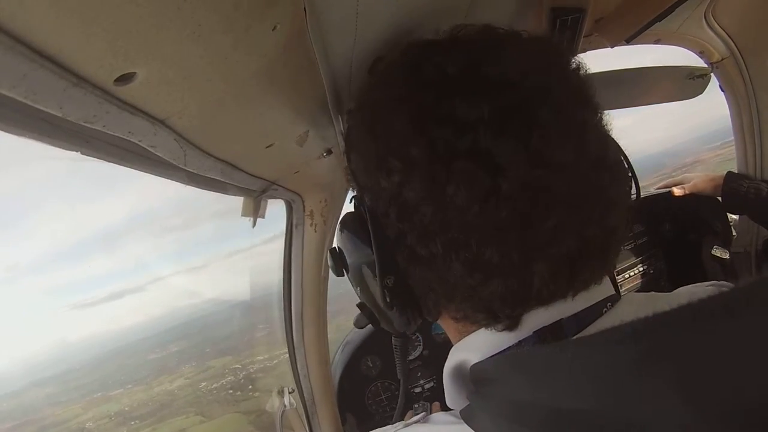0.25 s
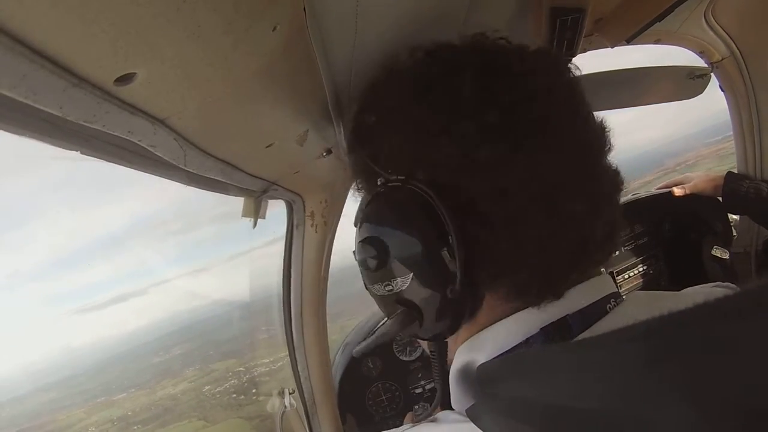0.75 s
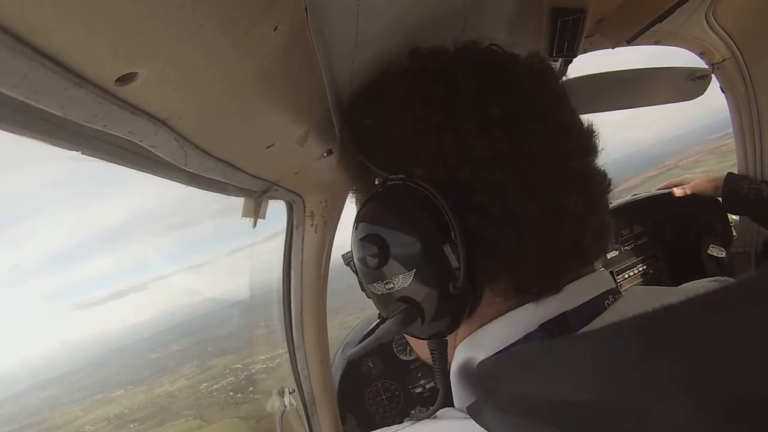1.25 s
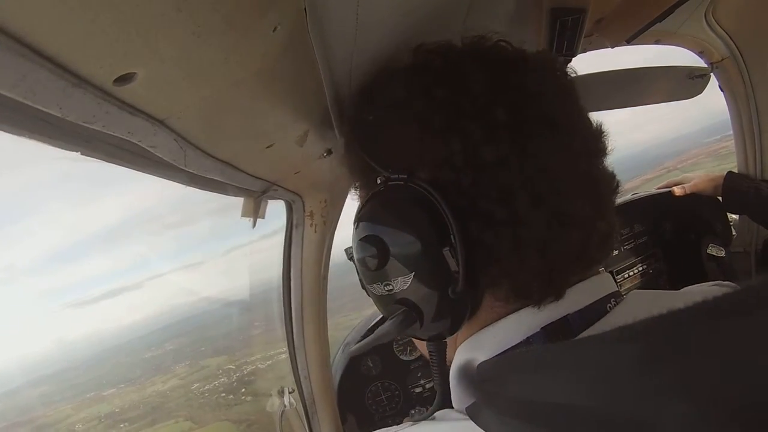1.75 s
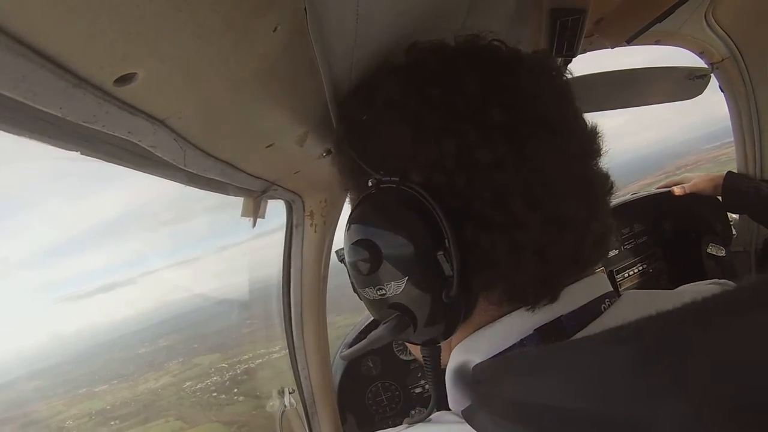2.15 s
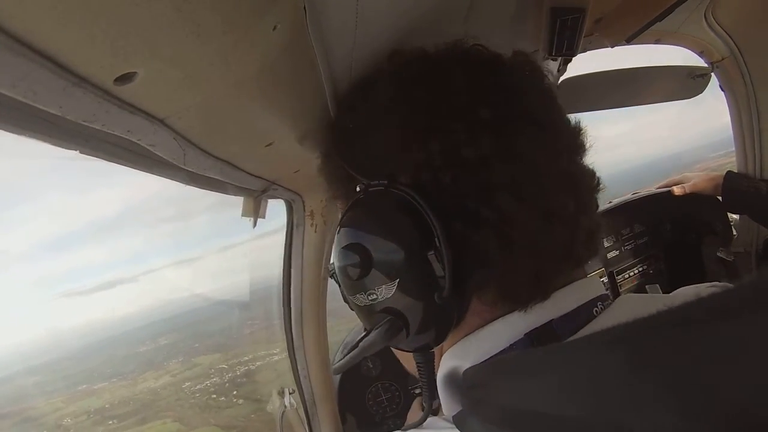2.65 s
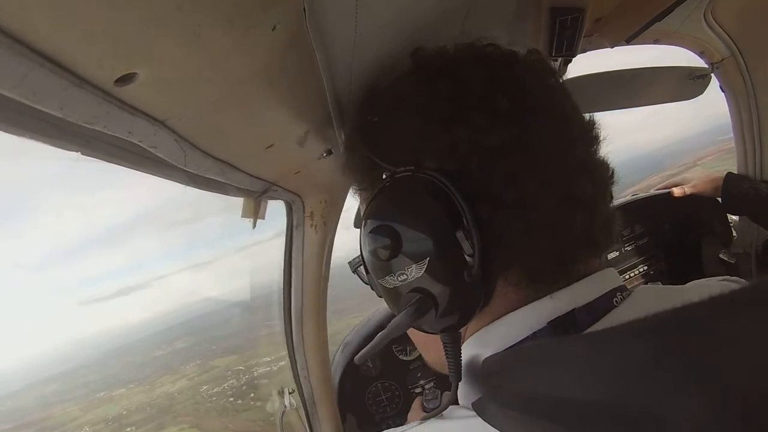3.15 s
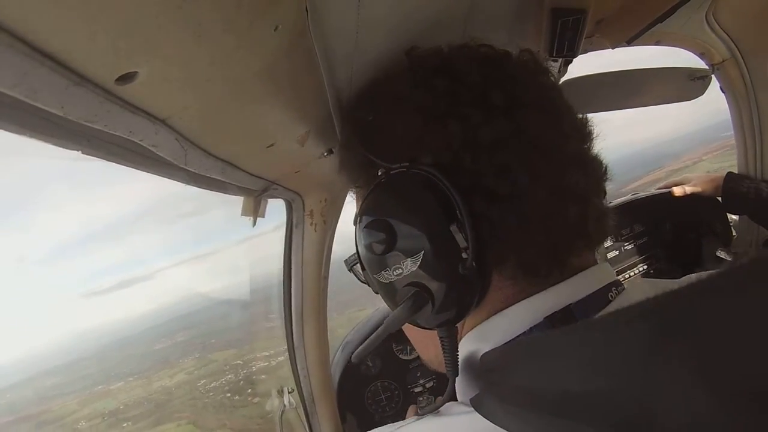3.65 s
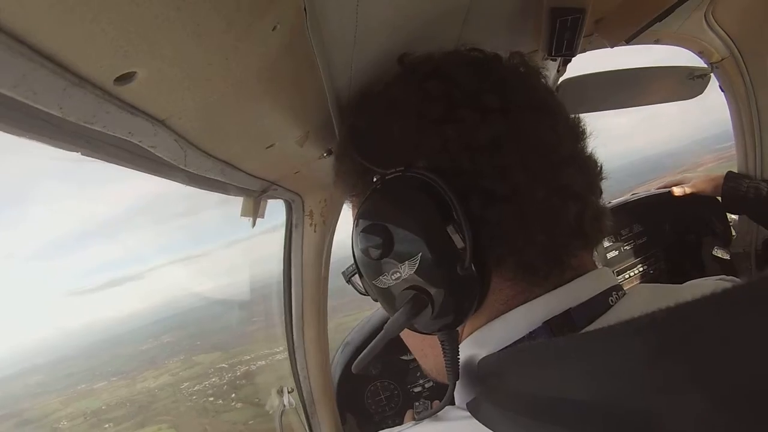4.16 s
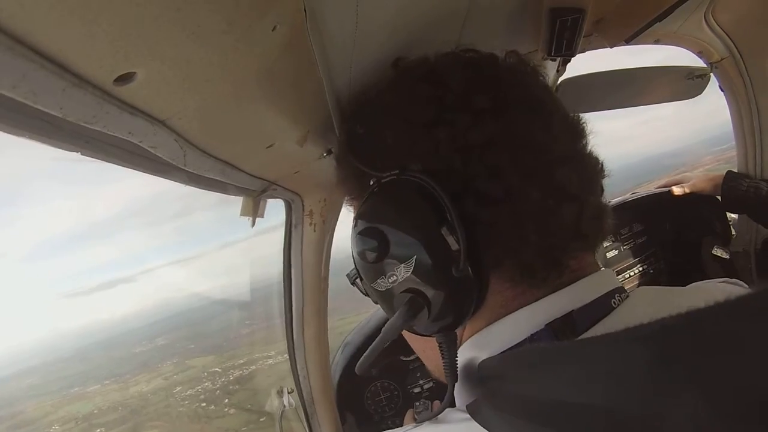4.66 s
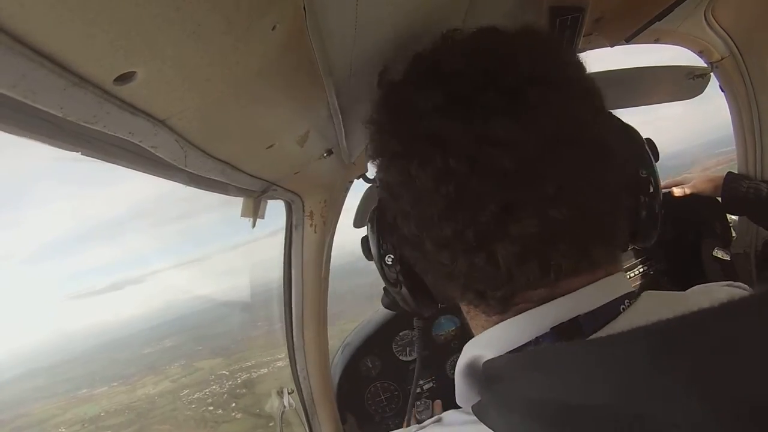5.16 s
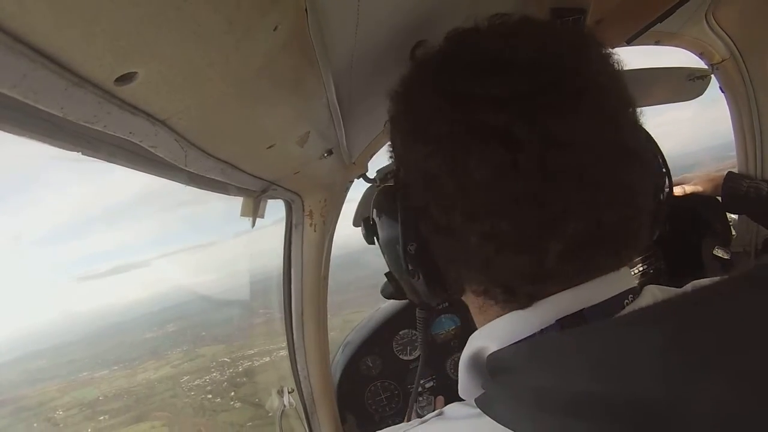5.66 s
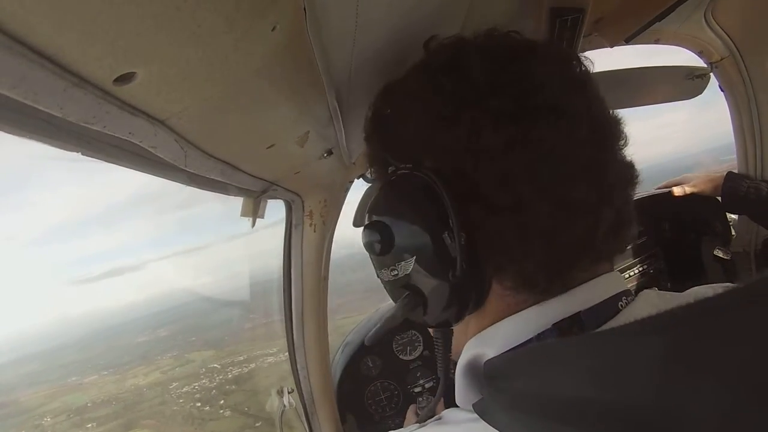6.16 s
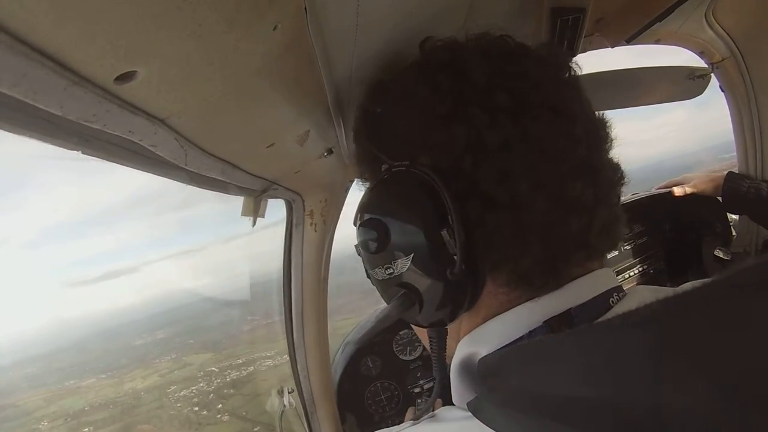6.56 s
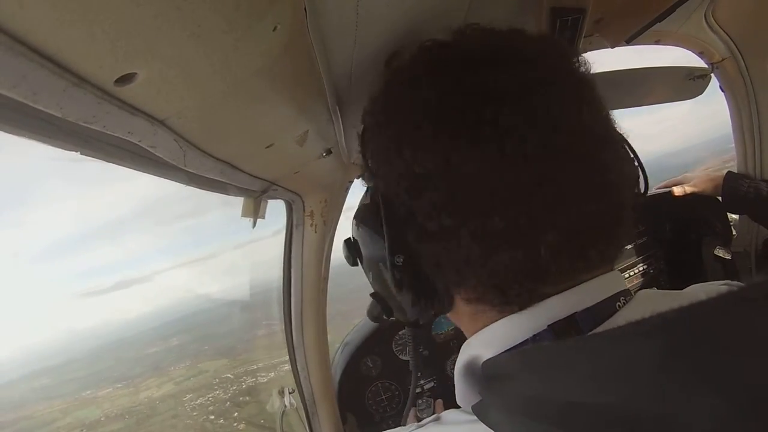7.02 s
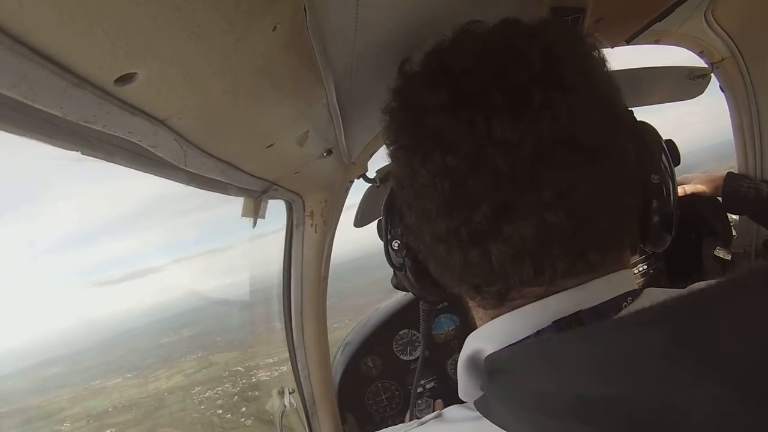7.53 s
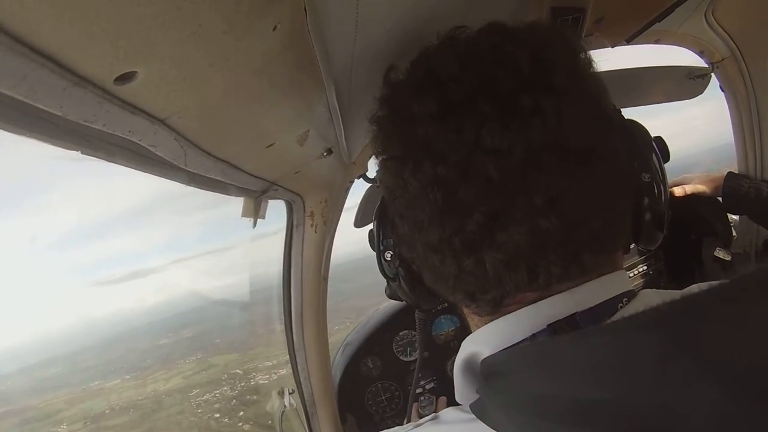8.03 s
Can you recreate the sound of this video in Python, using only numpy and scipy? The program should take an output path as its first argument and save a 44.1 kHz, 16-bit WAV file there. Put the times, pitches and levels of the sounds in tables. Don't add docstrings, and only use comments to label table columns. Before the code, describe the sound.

A constant low engine and propeller drone dominates a cramped aircraft cabin, heard from a microphone behind the pilot's head. Bass pulses and panel buzz blend with dull, turbulent wind noise, thin mechanical whine and fine clatter. The midrange brightens and dulls subtly. Light, dry clicks and short rattling bursts from a nearby plastic mount come and go irregularly while the drone continues unbroken to the end.

```python
import sys
import numpy as np
from scipy import signal
from scipy.fft import rfft, irfft, next_fast_len
from scipy.io import wavfile
from scipy.ndimage import uniform_filter1d, map_coordinates

SR = 44100
rng = np.random.default_rng(int(sys.argv[2]) if len(sys.argv) > 2 else 0)


def volts_from_decibels(level):
    exponent = np.asarray(level, float) / 20
    return 10 ** exponent


def dump(signal):
    limited = np.clip(np.atleast_2d(signal).T, -1, 1)
    pcm = np.round(limited * 32767).astype(np.int16)
    wavfile.write(sys.argv[1], SR, pcm)


N = 365588


def curve(table, column):
    rows = np.array(table)
    return np.interp(np.arange(N) / SR, rows[:, 0], rows[:, column])


def colour_db(table, hz):
    rows = np.array(table)
    return np.interp(np.log(hz + 1e-9), np.log(rows[:, 0]), rows[:, 1])


def walk(rate):
    hold = max(int(SR / 64 / rate), 1)
    held = np.repeat(rng.standard_normal(900), hold)[:N // 64 + 1]
    smooth = 1.3 * uniform_filter1d(uniform_filter1d(held, hold), hold)
    return np.interp(np.arange(N) / 64, np.arange(len(smooth)), smooth)


def engine_cycle():
    # (time [s], rate [cycles/s])
    speed = [
        (0.0, 20.562),
        (1.95, 20.533),
        (2.44, 20.439),
        (2.93, 20.395),
        (3.9, 20.425),
        (4.88, 20.483),
        (5.85, 20.494),
        (7.31, 20.561),
        (8.29, 20.512),
    ]
    return np.cumsum(curve(speed, 1)) / SR


def tones(orders, cycle, wobble, slip, rate):
    out = np.zeros(N)
    for multiple, db in orders:
        waver = wobble * min(multiple / 13.0, 1) ** 2 * walk(rate)
        size = np.sqrt(2) * volts_from_decibels(db) * (1 + waver)
        phase = 2 * np.pi * (multiple * cycle + rng.random()) + slip * walk(rate)
        out += size * np.sin(phase)
    return out


def engine_drone(cycle):
    # (multiple of the cycle rate, rms level [dB])
    drone = [(1, -31.5), (2, -35.5), (4, -19), (5, -35), (7, -28.5), (8, -25.5), (9, -23.5), (10, -24),
             (11, -39.5), (12, -31.5), (13, -41), (14, -43), (16, -37), (17, -42), (18, -52.5), (19, -55.5),
             (20, -46), (22, -36.5),
             (25, -55), (26, -55), (28, -56.5), (29, -55.5), (30, -54), (31, -58.5), (32, -50), (33, -42.5),
            (34, -49), (35, -50.5), (36, -41), (37, -35.5), (38, -52), (39, -49.5), (40, -48.5), (41, -58)]
    return tones(drone, cycle, wobble=0.15, slip=0.13, rate=3.)


def gear_whine(cycle):
    # (multiple of the cycle rate, rms level [dB])
    whines = [(57, -54.5), (67, -55.5), (70, -50.5), (81, -46.5), (82, -41), (90, -46), (95, -45.5),
              (97, -45), (98, -45), (102, -42.5), (109, -52)]
    return tones(whines, cycle, wobble=0.28, slip=1.0, rate=7.6)


def cabin_power(hz):
    # (frequency [Hz], level [dB per Hz])
    walls_low = [(12, -63), (34, -58), (52, -51), (92, -44.5), (120, -51.5), (270, -50), (350, -52.5),
                 (465, -49.5), (520, -58.5), (620, -61), (850, -62.5), (1020, -73.5)]
    # (frequency [Hz], level [dB per Hz])
    walls_high = [(1020, -75), (1200, -66), (1520, -65.5), (2420, -71), (2900, -74.5), (4000, -82.5),
                  (4900, -85.5), (7400, -91.5), (8300, -99), (10300, -103), (12500, -108), (14000, -110),
                  (15000, -124), (22050, -150)]
    # (centre [Hz], width [Hz], level at the top [dB per Hz])
    modes = [(23, 9, -47.5), (69.6, 11.6, -29), (76.5, 21, -40), (152.7, 31.6, -38), (199, 36.7, -37),
             (730, 130, -58), (887.8, 11.2, -52), (730, 7, -57.5), (556, 11, -59), (814, 9.7, -62),
             (1344, 120, -61.5), (1426, 65, -61.5), (1686, 130, -59), (1845, 150, -56.5), (2030, 99, -58),
             (2204, 266, -58.5), (2595, 227, -64.5), (3620, 560, -80.5), (6050, 910, -86), (9270, 760, -99),
             (10900, 400, -101), (12000, 400, -105), (13300, 900, -108), (6900, 150, -91.5),
             (4114, 120, -78)]
    power = volts_from_decibels(2 * colour_db(walls_low + walls_high[1:], hz))
    for centre_hz, width_hz, top_db in modes:
        detuning = 2 * (hz - centre_hz) / width_hz
        power = power + volts_from_decibels(2 * top_db) / (1 + detuning ** 2) ** 2
    return power


def valve_clatter(cycle):
    over_db = 3.5
    multiple = np.arange(2049)
    chance = rng.standard_normal((2, len(multiple)))
    inside = (multiple > 43) & (multiple < 132)
    size = np.sqrt(cabin_power(multiple * 20.5)) * volts_from_decibels(over_db) * inside
    pattern = irfft(size * (chance[0] + 1j * chance[1])) * 2048
    place = (cycle + 0.00031 * walk(11.0)) % 1 * len(pattern)
    return map_coordinates(pattern, [place], order=3, mode="grid-wrap")


def panel_throb(cycle):
    turn = 2 * np.pi * cycle
    throb = 1 + 0.12 * np.cos(4 * turn) + 0.033 * np.cos(2 * turn + 1)
    throb = throb + 0.082 * np.cos(3 * turn + 2) + 0.07 * np.cos(6 * turn)
    uneven = walk(95)
    return throb * volts_from_decibels(1.2 * (uneven - uniform_filter1d(uneven, SR // 16)))


def slipstream(cycle, shade_db):
    surge_db, surges_per_s = 1.5, 4.
    boom_db = 0.64 + surge_db * walk(surges_per_s)
    rumble_db = surge_db * walk(surges_per_s)
    hiss_db = 0.73 * shade_db
    size = next_fast_len(N)
    hz = np.arange(size // 2 + 1) * SR / size
    noise = rfft(rng.standard_normal(size)) * np.sqrt(cabin_power(hz) * SR / 2)
    throb = panel_throb(cycle)
    gust = walk(9)
    out = np.zeros(N)
    octave = np.log2(np.maximum(hz / 17, 1))
    for centre in np.arange(0, 11.):
        share = np.cos(np.pi / 2 * np.clip(octave - centre, -1, 1)) ** 2
        centre_hz = 17 * 2 ** centre
        if centre_hz < 90:
            db = boom_db
        elif centre_hz < 200:
            db = rumble_db
        elif centre_hz < 2900:
            db = shade_db
        else:
            db = hiss_db
        flicker_db = (0.73 * gust + 0.5 * walk(15)) * min(centre_hz / 3900.0, 1)
        pulse = throb if 1500 < centre_hz < 2700 else 1
        out += volts_from_decibels(db + flicker_db) * pulse * irfft(noise * share, size)[:N]
    return out


def head_shade():
    # (time [s], level [dB])
    shade = [(0.0, -26.5), (1.01, -23.5), (1.29, -25.5), (2.49, -25), (3.23, -25), (4.8, -24), (5.19, -26),
             (5.96, -27), (6.65, -25), (7.46, -26), (8.01, -24), (8.29, -26.5)]
    level_db = curve(shade, 1)
    return level_db - level_db.mean()


def ring(drive, table):
    size = next_fast_len(len(drive))
    hz = np.arange(size // 2 + 1) * SR / size
    return irfft(rfft(drive, size) * volts_from_decibels(colour_db(table, hz)), size)[:N]


def bounce_train(t, ms, sizes):
    rise_db_per_ms, fall_db_per_ms, bounce_ms = 1.5, 0.1, 1.4
    gap_ms = 3 + 1.5 * sizes[0]
    crest_ms = 0.33 * ms * (ms > 8)
    after_ms = t - crest_ms
    number = (after_ms // gap_ms).astype(int)
    strength_db = -7 * sizes[number] * (number != 0)
    strength_db = strength_db - rise_db_per_ms * np.maximum(-after_ms, 0)
    strength_db = strength_db - fall_db_per_ms * np.maximum(after_ms, 0)
    decay = np.exp(-(after_ms % gap_ms) / bounce_ms)
    return volts_from_decibels(strength_db) * decay * np.clip(ms - t, 0, 1)


def mount_ticks():
    # (time [s], peak level [dB], burst length [ms])
    knocks = [(0.5522, -54, 1.8), (0.9005, -47, 2.3), (0.951, -51, 2.5), (1.2138, -45, 11),
              (1.243, -41, 18.2), (1.421, -51, 2.6), (2.7414, -50.5, 11), (2.8727, -50, 3.8),
              (2.9599, -51, 13), (3.1382, -43, 7.2), (3.212, -52, 7.0), (3.5708, -52, 1.7),
              (3.5882, -49.5, 17), (3.6184, -46, 22), (3.8558, -49, 15), (3.89, -50, 12.2),
              (3.924, -45.5, 4.3), (4.67, -50.5, 7.2), (4.9355, -48.5, 15), (5.374, -51.5, 2.4),
              (5.3966, -48, 6.7), (5.484, -51, 4.3), (6.149, -43.5, 9.5), (6.306, -45, 2.8),
              (6.812, -46, 20), (6.8453, -50, 5.9), (7.3382, -48, 2.7), (7.4837, -48, 2.3),
              (8.0604, -51, 8.4), (8.075, -52, 1.7)]
    # (frequency [Hz], level [dB])
    housing = [(5500, -31), (7000, 3.5), (9300, 6), (11700, -7), (13300, 2.5), (14300, -2.5), (15300, -25)]
    # (frequency [Hz], level [dB])
    body = [(1600, -25.5), (2300, 11.5), (3200, 11.5), (4500, -0.5), (6500, -3), (8500, -21)]
    loose_s, loose_db = 0.11, 6
    drive = np.zeros((2, N + 2048))
    t = np.arange(2048) / SR * 1000
    chance = rng.standard_normal((len(knocks), 2, 2048))
    bounce = rng.random((len(knocks), 24))
    loose = np.zeros(N)
    for (s, db, ms), grit, sizes in zip(knocks, chance, bounce):
        i = int(s * SR)
        burst = bounce_train(t, ms, sizes)
        body_db = 4.5 + 3.5 * np.log2(ms)
        drive[0, i:i + 2048] += volts_from_decibels(db + 4.5) * grit[0] * burst
        drive[1, i:i + 2048] += volts_from_decibels(db + body_db + 0.5) * grit[1] * burst
        loose[i] = 1
    near = np.minimum(uniform_filter1d(loose, int(loose_s * SR)) * loose_s * SR, 1)
    faint = rng.random(N) < 50 / SR * volts_from_decibels(4 * walk(5) + loose_db * near)
    faint_db = -45.5 + 2.2 * np.minimum(rng.exponential(size=N), 2)
    sign = np.sign(rng.standard_normal(N))
    drive[:, :N] += faint * volts_from_decibels(faint_db) * sign * np.array([[1], [2.5]])
    return ring(drive[0], housing) + ring(drive[1], body)


def scene():
    cycle = engine_cycle()
    shade_db = head_shade()
    engine = engine_drone(cycle)
    gears = gear_whine(cycle) + valve_clatter(cycle)
    air = slipstream(cycle, shade_db)
    mix = engine + volts_from_decibels(shade_db) * gears + air + mount_ticks()
    return mix[None]


def roll_off(x):
    return signal.sosfilt(signal.butter(12, 15300, fs=SR, output="sos"), x)


def record(dry):
    rounded = np.tanh(0.7 * dry) / 0.7
    return roll_off(rounded)


dry = scene()
out = record(dry)
dump(out)
```